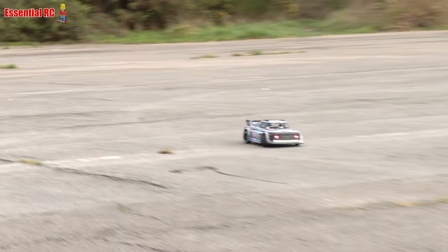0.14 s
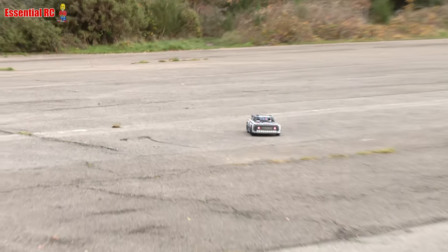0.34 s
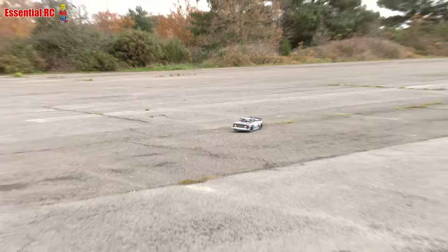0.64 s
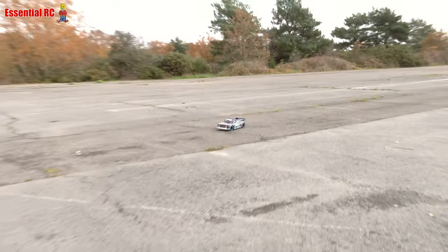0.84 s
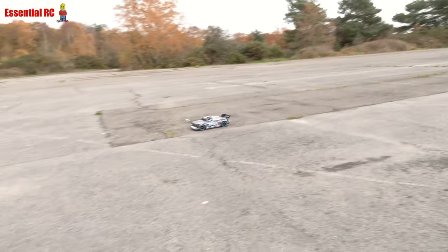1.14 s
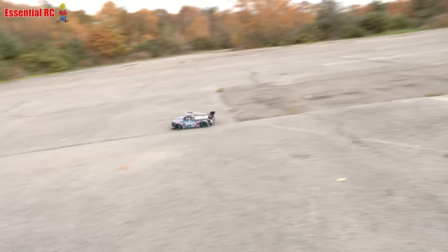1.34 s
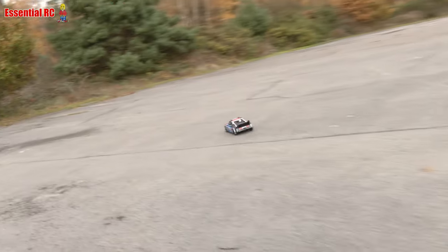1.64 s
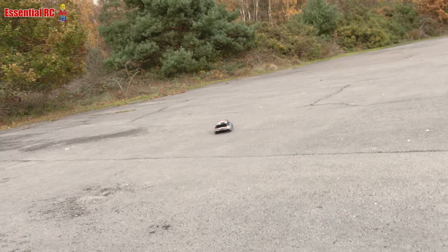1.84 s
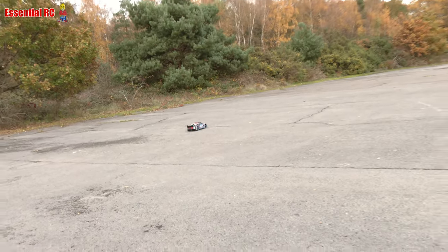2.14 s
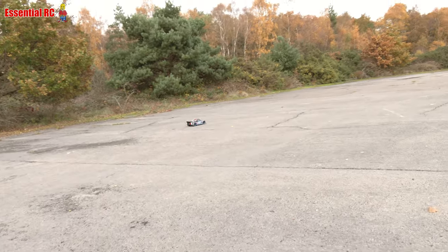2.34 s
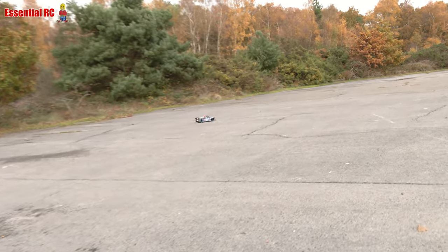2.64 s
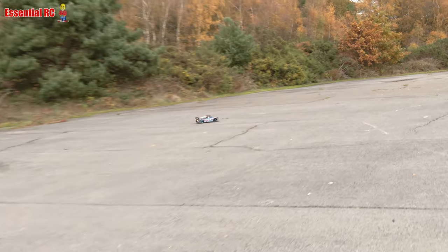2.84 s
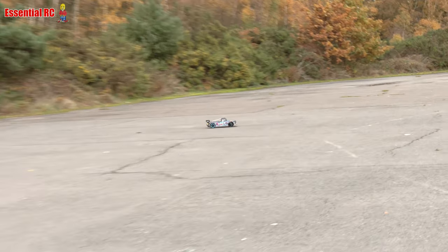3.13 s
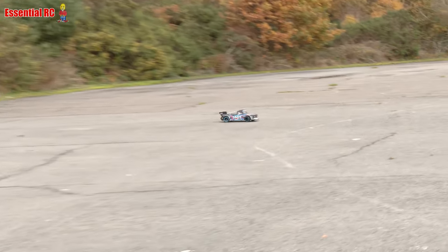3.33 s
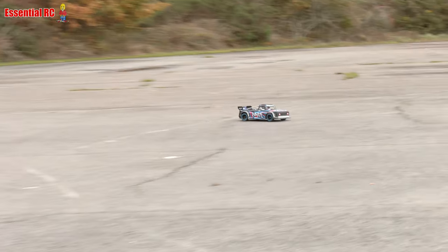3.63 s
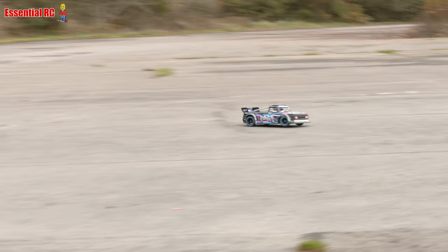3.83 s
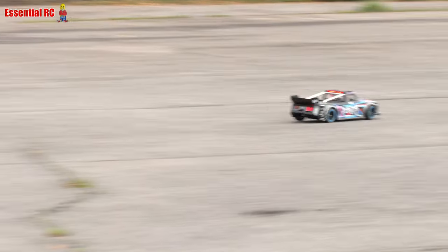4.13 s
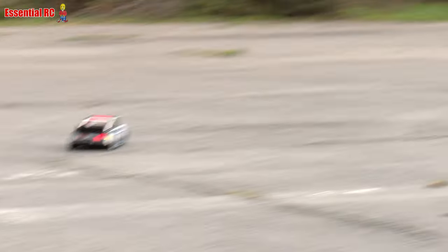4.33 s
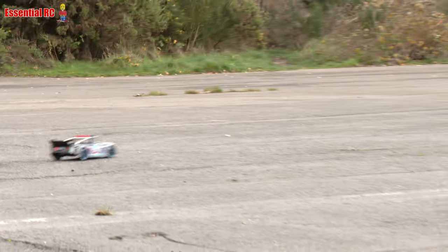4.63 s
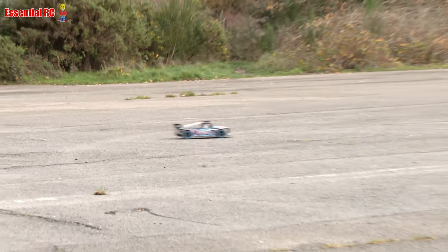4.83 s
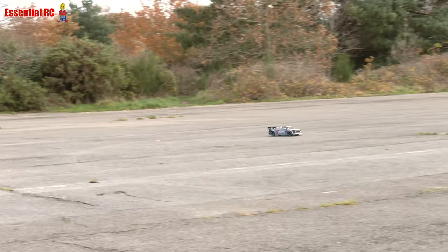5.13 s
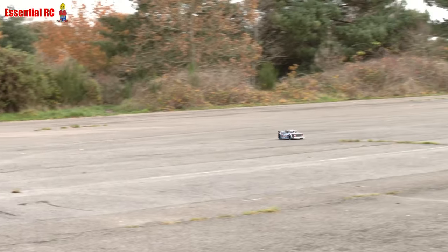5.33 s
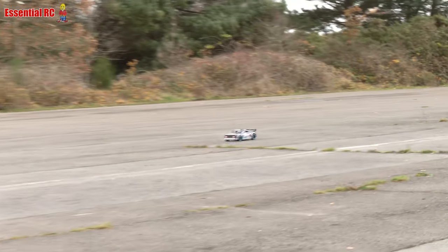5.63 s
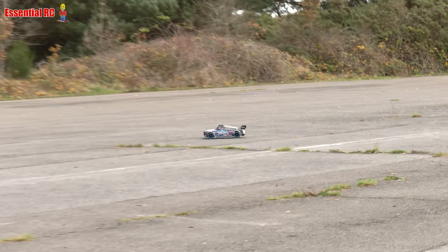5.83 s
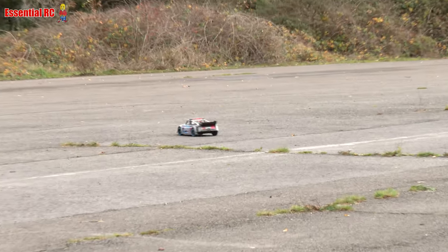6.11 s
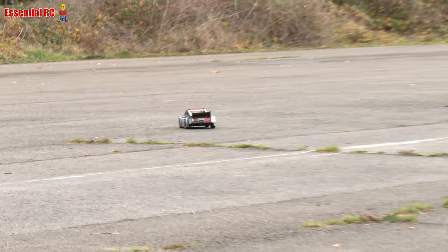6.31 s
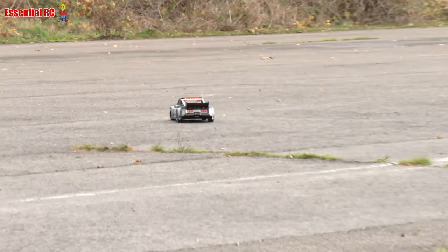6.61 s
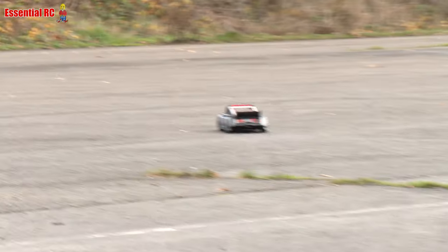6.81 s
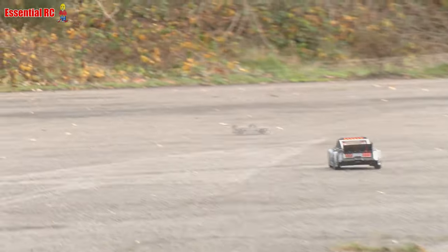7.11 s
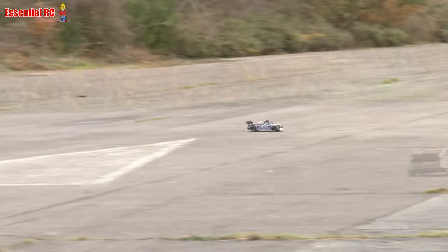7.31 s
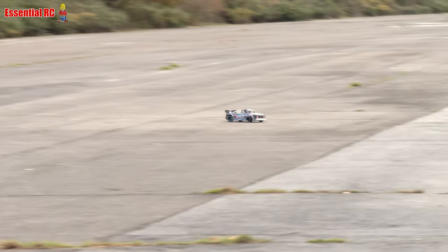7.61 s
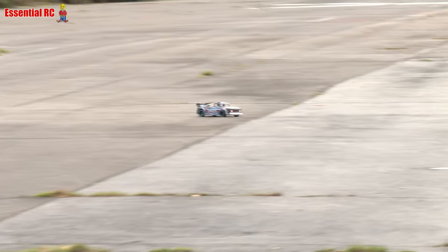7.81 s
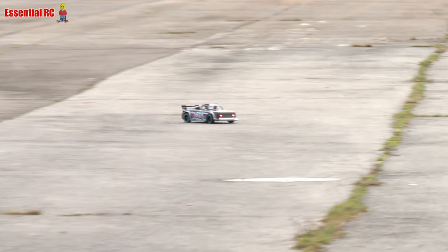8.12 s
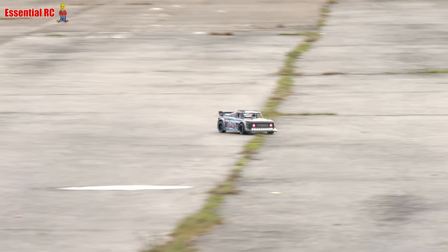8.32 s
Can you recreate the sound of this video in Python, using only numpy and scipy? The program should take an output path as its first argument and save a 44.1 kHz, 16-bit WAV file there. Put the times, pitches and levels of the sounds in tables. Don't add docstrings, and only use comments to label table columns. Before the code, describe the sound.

Outdoors on open asphalt, a small electric model truck is heard through a hand-held stereo microphone. It starts with a brief dip in its whine, then from about 0.4 s revs up into a raspy, hissing gear whine near 2.3 kHz, loud and close around 1 to 1.7 s, with tyre scrub and bright stone ticks at 1.1 and 1.4 s. At 1.75 s the pitch drops sharply and grit spatters the shell. It revs again from 2.2 s, dips near 2.8 s, then holds high until 4.5 s with rough sliding tones. At 4.7 s the throttle cuts briefly, with a knock and a wind slap on the right. The whine returns, falls at 5.6 s, then pulses lower, dipping at 6.3 and 6.6 s with short squeals. After 7 s it eases, faint and distant, then climbs high from 8 s to the end. Soft wind, traffic and leaves remain behind.

```python
import sys
import numpy as np
from scipy import signal
from scipy.fft import rfft, irfft
from scipy.io import wavfile
from scipy.ndimage import uniform_filter1d

SR = 44100
rng = np.random.default_rng(int(sys.argv[2]) if len(sys.argv) > 2 else 0)


def transcribe(u):
    v = np.clip(np.atleast_2d(u).T, -1, 1)
    q = np.round(v * 32767).astype(np.int16)
    wavfile.write(sys.argv[1], SR, q)


def convert_level_to_amplitude(level_db):
    exponent = np.asarray(level_db, float) / 20
    return 10 ** exponent


N = 373086
HZ = np.maximum(np.fft.rfftfreq(N, 1 / SR), 1)

# t/s, mesh rate aimed at f/Hz, motor lag/s, gear hiss over tyre roar level/dB
THROTTLE_MOVES = [(0.0, 2240, .05, 10), (.31, 1753, 0.11, 6), (.4, 1790, 0.078, 13),
                  (.48, 1988, 0.028, 14.5), (.65, 2297, 0.075, 13.5), (2.13, 1110, 0.053, 10),
                  (2.19, 1810, .09, 12.5), (2.4, 1960, 0.065, 12), (2.54, 2303, 0.092, 12.5),
                  (2.68, 2225, 0.054, 12), (2.97, 1812, 0.041, 9.5), (3.15, 2090, .015, 9.5),
                  (3.25, 2260, 0.054, 11), (3.5, 2216, 0.086, 12.5), (4.06, 2080, 0.047, 7),
                  (4.19, 2280, 0.032, 9.5), (4.726, 1465, 0.037, 4), (4.775, 2097, .25, 8),
                  (4.97, 1945, 0.048, 10.5), (5.15, 2224, 0.045, 10.5), (5.75, 1210, 0.043, 12.5),
                  (5.84, 1496, 0.02, 16.5), (6.02, 1612, 0.034, 19), (6.22, 1697, 0.019, 17.5),
                  (6.395, 1280, .015, 14), (6.468, 1687, .03, 14.5), (6.685, 1713, 0.074, 13),
                  (6.965, 1784, .012, 14), (7.025, 2060, 0.014, 10), (7.17, 1960, 0.022, 8),
                  (7.58, 1540, .22, 4.5), (7.83, 1474, .06, 9), (8.0, 1654, 0.08, 7.5),
                  (8.07, 1930, 0.052, 9), (8.305, 2280, 0.022, 7.5), (8.4, 2370, 0.04, 9),
                  (.095, 1078, 0.07, 5.5), (.22, 1081, 0.058, 1), (1.745, 1824, 0.016, 12.5),
                  (1.79, 947, 0.096, 8), (1.98, 996, .081, 5), (2.825, 1768, 0.017, 9),
                  (4.01, 1932, 0.023, 10.5), (4.55, 2090, 0.019, 9), (4.64, 1392, .035, 8),
                  (4.695, 1432, .045, -9), (4.749, 1480, 0.04, -1.5), (5.59, 1510, 0.07, 13),
                  (5.635, 997, 0.033, 7.5), (6.265, 1091, .03, 13), (6.525, 1487, 0.029, 11.5),
                  (6.57, 969, 0.031, 10), (7.089, 1746, 0.0084, 10), (7.245, 1545, .12, 3.5),
                  (7.29, 1520, 0.097, -1), (7.439, 1510, 0.14, -3)]
# t/s, drop f/Hz
WHEEL_BITES = [(.78, -220), (.875, -89.5), (.975, -71), (1.157, 171), (1.245, 50), (1.215, -90),
               (1.46, -110), (1.49, -59), (1.537, 120), (2.7, 80), (2.77, -60.5), (3.12, 19), (3.27, -110),
               (3.319, 89), (3.42, -61.5), (3.54, 90.5), (3.6, -50), (3.72, 61), (3.83, -60.5),
               (3.93, 60.5), (3.99, -51), (4.28, -120), (4.39, -79.5), (4.49, 70.5), (5.05, -60.5),
               (5.27, 49), (5.51, 70), (3.22, 50), (8.196, 59), (.822, 60), (1.64, 70), (1.712, 60),
               (1.34, -50), (1.575, -70), (1.68, -70), (1.085, -60), (4.03, 61), (8.43, -40), (6.95, 138.5),
               (8.235, -61), (8.28, 28.5), (8.38, 50)]
# t/s, nearness as tyre roar level/dB, brightness/(dB per octave)
PATH = [(0, -42.5, 8), (.4, -43.5, 13), (.6, -43, 0), (.95, -38.5, 3), (1.35, -37, 21), (1.75, -38, -3.5),
        (2.1, -42, 2.5), (2.6, -44.5, 10.5), (3.3, -44, 26), (3.8, -46, 12.5), (4.4, -40, 2.5),
        (4.9, -46, 10), (5.6, -47.5, 1.5), (6.05, -55.5, 3), (6.5, -51.5, -1.5), (7.1, -51, 2.5),
        (7.9, -57, 3), (8.46, -51.5, 7.5)]
# t/s, then first, second, higher harmonics
# as level/dB over 100 Hz of hiss
GEARBOX_FACING = [(0, 13, 16, 8), (.13, 12, 8, 7), (.4, 14, 11, 6), (.5, 12.5, 12, 8), (.62, 13.5, 10, 8),
                  (.9, 11, 10.4, 9), (1.4, 12, 10.5, 5.5), (1.72, 9, 12, 5), (1.78, 5, 0, 3.5),
                  (2.15, 11, 0, 10), (2.3, 11, 14, 10.5), (2.7, 15, 10.5, 6.5), (2.85, 11, 10, 3),
                  (3.0, 9, 11, 11), (3.45, 10.5, 17, 9), (3.7, 17, 10.5, 11), (4.05, 11, 10.5, 7.5),
                  (4.45, 11.5, 14.5, 10.5), (4.9, 5, 11.5, 9), (5.3, 12, 12.5, 11), (5.58, 20, 20, 11.5),
                  (5.7, 11, 6, 7), (6.05, -6, 11, 11), (6.27, 2, 19, 12), (6.38, 0, 5, 10.5),
                  (6.53, 4, 18, 13.5), (6.65, 2, 11, 12), (6.9, 10, 14, 14.5), (7.1, 17.5, 13.5, 11),
                  (7.8, -5, 4, 9), (8.05, 2, 18, 11), (8.25, 10, 17.5, 10.5), (8.46, 19, 14.5, 12.5)]
HARMONIC_DB = [0, 2.5, 1, -.5, -4]
# f/Hz, level/dB per Hz
GEAR_SPECTRUM = [(300, -58), (800, -8), (1350, -2), (1750, -2), (2400, -4.5), (2950, -4), (3900, -5.5),
                 (5300, -5), (6900, -2.5), (8000, -1.5), (9100, -8.5), (9900, -18.5), (14000, -28),
                 (15600, -56)]
# f/Hz, level/dB per Hz
TYRE_SPECTRUM = [(30, -63), (150, -16.5), (300, -9.5), (430, -6), (600, 3.5), (760, -2.5), (950, -2),
                 (1300, -5), (1750, -6), (2500, -7.5), (4000, -20), (8000, -74)]
# f/Hz, level/dB per Hz
AIR_SPECTRUM = [(59, -43), (100, -1.5), (370, -3), (588, -5), (997, 3), (1230, -10), (1690, -30),
                (2580, -29), (2860, -29), (3390, -14), (7390, -30), (11000, -41), (14800, -24),
                (15600, -47)]
# f/Hz, level/dB per Hz
WIND_SPECTRUM = [(20, -30), (35, -8), (55, -1.5), (90, -0.5), (170, -1.5), (280, -8.5), (500, -26),
                 (1000, -51)]
# peak t/s, level/dB, half length/s
GUST_PEAKS = [(0.077, -42, 0.095), (0.553, -51.5, 0.2), (1.716, -54, 0.078), (2.296, -64, 0.1),
              (3.9, -65, 0.099), (4.463, -49, 0.23), (4.725, -61.5, 0.047), (5.818, -51, 0.073),
              (6.021, -56.5, 0.036), (6.201, -54, 0.045), (6.969, -53, 0.063)]
# t/s, peak level/dB, f/Hz
WIND_SLAP = (4.722, -27.5, 101)
# t/s, peak level/dB, f/Hz
STONE_KNOCKS = [
    (0.129, -37, 615),
    (1.089, -17, 4780),
    (1.382, -16, 6590),
    (1.449, -26, 898),
    (2.099, -26, 703),
    (4.728, -24, 1490),
    (4.971, -23.5, 1720),
]
# t/s, peak level/dB
GRIT_SPATTERS = [(4.726, -28), (4.738, -33), (1.7538, -17), (1.7943, -10), (1.8147, -22), (1.8466, -14.5),
                 (1.8796, -21), (1.9574, -19), (2.117, -30), (2.1879, -30), (7.2673, -40), (7.3791, -37),
                 (7.416, -41), (7.5906, -41), (7.6275, -42), (7.6709, -39.5), (7.7263, -41.5),
                 (7.7846, -45.5), (7.8101, -36.5), (7.8729, -38.5), (0.1572, -24), (0.2645, -25),
                 (0.3014, -25), (0.3333, -25), (0.3992, -27)]
# t/s, length/s, squeal f/Hz, level/dB, roughness (0 to 1)
TYRE_SLIDES = [(1.034, 0.5, 969, -40.5, 0.92), (1.662, 0.044, 928, -44, 0.9),
               (1.949, 0.16, 1740, -54.5, 1.0), (2.354, 0.31, 949, -47, 0.9),
               (2.701, 0.22, 944.6, -45, 0.73), (3.0, 0.46, 950, -48, 0.88), (2.95, 0.43, 1773, -52, 0.85),
               (3.75, 0.41, 960, -50.5, 1.04), (4.909, 0.043, 1854, -52, 0.94),
               (4.952, .04, 1690, -47.5, 0.85), (5.738, 0.41, 979, -57.5, 0.77),
               (5.788, 0.041, 1137, -51, 0.34), (6.208, 0.064, 1663, -51.5, 0.8),
               (6.367, 0.029, 998, -40.5, 0.24), (6.631, 0.052, 996, -48, 0.3),
               (6.825, 0.088, 1655, -50.5, 0.62), (6.971, 0.094, 1745, -52.5, 0.57),
               (7.102, 0.094, 1716, -49.5, 0.28), (7.237, 0.17, 1750, -62, 0.83),
               (4.3, 0.075, 1353, -46, 0.91), (4.552, 0.084, 2054, -46.5, 0.64)]
# f/Hz, level/dB
PORT_BALANCE = [(60, -6), (250, 0), (430, 3), (750, 6.5), (950, 4.6), (1640, 8), (2500, 4.2), (3300, 1.9),
                (4200, 0), (5900, -4.6), (7700, -5.3), (9000, -1.8), (10200, 0), (15000, 0)]
# f/Hz, phase/rad
PORT_PHASE = [(100, 4.1), (650, 4.05), (800, 3.6), (1100, 3.7), (2070, 3.2), (2950, 3.0), (3800, 2.45),
              (5500, 1.9), (8100, 1.6), (9400, .9), (10200, .1), (11300, -.3), (12400, -1.3), (13700, -2.4),
              (14600, -2.2)]
# f/Hz, share (0 to 1)
PORT_SCATTER = [(100, .3), (500, .13), (750, .25), (950, .15), (1600, .28), (3000, .22), (5000, .3),
                (8000, .27), (10000, .3), (13200, .35), (14600, .4)]

BITE_S, LOAD_LAG_S = .02, 0.015
HISS_DB_PER_OCTAVE = 1
COAST_FADE_DB = .3
SLOW_FADE_DB, SLOW_HZ = 2.0, 1600
ROUGH_FAR, ROUGH_PER_DB, FAR_DB = .45, .02, -57
BRIGHT_SWING, ROAR_SWING_DB = 1.9, 1.5
AIR_DB = -53.5
BREEZE_DB, BREEZE_FADE_DB_PER_S = -58, 0.4
GRIT_S, GRIT_DB = 0.0035, -7.5
SLIDE_ATTACK, SLIDE_RELEASE = 0.045, 0.7
SQUEAL_WANDER = .02


def rms_one(x):
    return x / np.sqrt(np.mean(x ** 2) + 1e-20)


def in_time(rows):
    s, *columns = np.transpose(rows)
    return [np.interp(np.arange(N) / SR, s, c) for c in columns]


def over_hz(points):
    hz, values = np.array(points)[:, 0], np.array(points)[:, 1]
    return np.interp(np.log(HZ), np.log(np.maximum(hz, 1)), values)


def colour(x, spectrum):
    return irfft(rfft(x) * convert_level_to_amplitude(over_hz(spectrum)), N)


def drift(rate):
    r = np.exp(-20 * np.pi * rate / SR)
    slow = signal.lfilter([1], [1, -2 * r, r * r], rng.standard_normal(N // 10 + 8002))
    slow = rms_one(slow[8000:])
    return np.interp(np.arange(N) / 10, np.arange(len(slow)), slow)


def noise(spectrum):
    return rms_one(colour(rng.standard_normal((2, N)), spectrum))


def tilt(x, db_per_octave):
    low = signal.sosfilt(signal.butter(2, 3000, fs=SR, output="sos"), x)
    high = signal.sosfilt(signal.butter(2, 8500, "high", fs=SR, output="sos"), x)
    low_change = convert_level_to_amplitude(-1.5 * db_per_octave) - 1
    high_change = convert_level_to_amplitude(.3 * db_per_octave) - 1
    return x + low_change * low + high_change * high


def rough_tone(phase, rate, rough):
    share = np.clip(rough, 0, 1)
    wander = np.sqrt(1 - share) + np.sqrt(share / 2) * (drift(rate) + 1j * drift(rate))
    return np.sqrt(2) * np.real(wander * np.exp(1j * phase))


def motor():
    moves, t = sorted(THROTTLE_MOVES), np.arange(N) / SR
    mesh_hz, load_db, now_hz = np.zeros(N), np.zeros(N), moves[0][1]
    for s, aim_hz, lag, db in moves:
        at = int(max(s, 0) * SR)
        now_hz = mesh_hz[at] or now_hz
        mesh_hz[at:] = aim_hz + (now_hz - aim_hz) * np.exp(-t[:N - at] / max(lag, .01))
        load_db[at:] = db
    mesh_hz[mesh_hz == 0] = moves[0][1]
    mesh_hz -= sum(drop_hz * np.exp(-((t - s) / BITE_S) ** 2) for s, drop_hz in WHEEL_BITES)
    r = np.exp(-1 / (LOAD_LAG_S * SR))
    first_db = moves[0][3]
    return mesh_hz, signal.lfilter([1 - r], [1, -r], load_db - first_db) + first_db


def gears(mesh_hz, hiss_db, bright, facing_db, rough, chatter):
    wobble = 1 + .004 * drift(25) + .009 * drift(90)
    phase = 2 * np.pi * np.cumsum(mesh_hz * wobble) / SR
    first_db, second_db, higher_db = facing_db
    first_db = first_db - 12 * np.clip((1450 - mesh_hz) / 250, 0, 1)
    levels_db = [first_db, second_db, higher_db, higher_db, higher_db]
    orders = []
    for k in range(5):
        tone = rough_tone((k + 1) * phase, 78 + 28 * k, rough)
        orders.append(convert_level_to_amplitude(levels_db[k] + 3.0 * drift(28)) * tone)
    whine = np.sqrt(200 / SR) * np.dot(convert_level_to_amplitude(HARMONIC_DB), orders)
    contact = rng.standard_normal((2, N)) + whine * [[1], [.55]]
    hiss_rms = np.sqrt(np.mean(convert_level_to_amplitude(over_hz(GEAR_SPECTRUM)) ** 2))
    return convert_level_to_amplitude(hiss_db + chatter) * tilt(colour(contact, GEAR_SPECTRUM) / hiss_rms, bright)


def tyres(roar_db, chatter):
    return convert_level_to_amplitude(roar_db + 8.5 + 0.036 * chatter + 1.6 * drift(28)) * noise(TYRE_SPECTRUM)


def far_air():
    return convert_level_to_amplitude(AIR_DB) * noise(AIR_SPECTRUM) * [[1], [2.5]]


def wind():
    t = np.arange(N) / SR
    breeze = convert_level_to_amplitude(BREEZE_DB - BREEZE_FADE_DB_PER_S * t)
    gusts = sum(convert_level_to_amplitude(db) * np.exp(-((t - s) / half) ** 2) for s, db, half in GUST_PEAKS)
    level_db = 20 * np.log10(breeze + gusts)
    sides_db = np.array([[-7], [5.2]])
    s, slap_db, slap_hz = WIND_SLAP
    cycles = (t - s) * slap_hz
    slap = -convert_level_to_amplitude(slap_db) * np.cos(2 * np.pi * cycles) * np.exp(-(cycles / 0.6) ** 2)
    return convert_level_to_amplitude(level_db + sides_db + 2.0 * drift(14)) * noise(WIND_SPECTRUM) + slap * [[.2], [1]]


def stones():
    out, t = np.zeros(N), np.arange(600) / SR
    for s, db, hz in STONE_KNOCKS:
        at = round(s * SR)
        out[at:at + 600] += convert_level_to_amplitude(db) * np.sin(2 * np.pi * hz * t) * np.exp(-t * hz / 5.8)
    return out * [[1], [0]]


def grit():
    t = np.arange(N) / SR
    bursts = sum(convert_level_to_amplitude(db + GRIT_DB) * np.exp(-((t - s - GRIT_S) / GRIT_S) ** 2) for s, db in GRIT_SPATTERS)
    return bursts * noise(GEAR_SPECTRUM)


def squeal():
    out, t = np.zeros(N), np.arange(N) / SR
    turns = 2 * np.pi * np.cumsum(1 + SQUEAL_WANDER * drift(3.0)) / SR
    slip = drift(58) + 1j * drift(77)
    smear = drift(240.0) + 1j * drift(130.0)
    for s, length, hz, db, rough in TYRE_SLIDES:
        part, share = (t - s) / length, np.clip(rough, 0, 1)
        fade = np.clip(np.minimum(part / SLIDE_ATTACK, 1 + (1 - part) / SLIDE_RELEASE), 0, 1) ** 2
        on = fade > 0
        strength = np.sqrt(2 - 2 * share) + np.sqrt(share) * slip[on]
        core = strength * np.exp(1j * hz * turns[on])
        octave = share * convert_level_to_amplitude(-4.0) * smear[on] * np.exp(2.1j * hz * turns[on])
        out[on] += fade[on] * convert_level_to_amplitude(db + 11.5) * np.real(core + octave)
    return out * [[1], [.3]]


def ports(direct, scattered):
    share, sign = np.clip(over_hz(PORT_SCATTER), 0, 1), np.array([[1], [-1]])
    mixed = np.sqrt(1 - share ** 2) * rfft(direct) + sign * share * rfft(scattered)
    turn = convert_level_to_amplitude(sign * over_hz(PORT_BALANCE) / 2) * np.exp(.5j * sign * over_hz(PORT_PHASE))
    return irfft(mixed * turn, N)


def scene():
    near_db, bright = in_time(PATH)
    mesh_hz, load_db = motor()
    hiss_db = near_db + load_db + HISS_DB_PER_OCTAVE * np.log2(mesh_hz / 2000)
    octaves = uniform_filter1d(np.log2(mesh_hz), size=1500)
    slowing = np.clip(-np.gradient(octaves) * SR, 0, 6)
    crawl = np.clip((SLOW_HZ - mesh_hz) / 450, 0, 1)
    whine_db = -COAST_FADE_DB * slowing - SLOW_FADE_DB * crawl
    chatter = .5 * drift(2.9) + np.minimum(2.0 * drift(163), 5.0)
    rough = ROUGH_FAR + ROUGH_PER_DB * (near_db - FAR_DB)
    truck = gears(mesh_hz, hiss_db + 1.0 + 0.48 * drift(7.7), bright + BRIGHT_SWING * drift(27.96),
                  in_time(GEARBOX_FACING) + whine_db, rough, chatter)
    truck = truck + tyres(near_db + ROAR_SWING_DB * drift(8.7), chatter)
    truck = truck + stones() + grit() + squeal()
    return ports(*(truck + far_air())) + wind()


def band_limit(x):
    return signal.sosfilt(signal.butter(12, 15620, fs=SR, output="sos"), x)


def record(dry):
    mix = .6 * np.tanh(dry / .6)
    return band_limit(mix)


dry = scene()
out = record(dry)
transcribe(out)
```